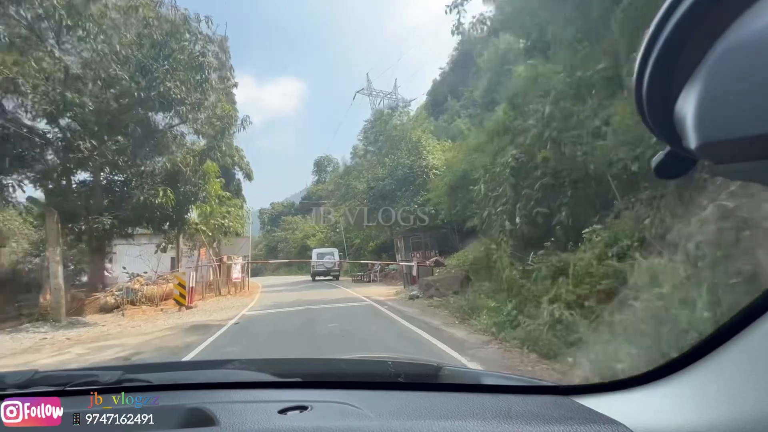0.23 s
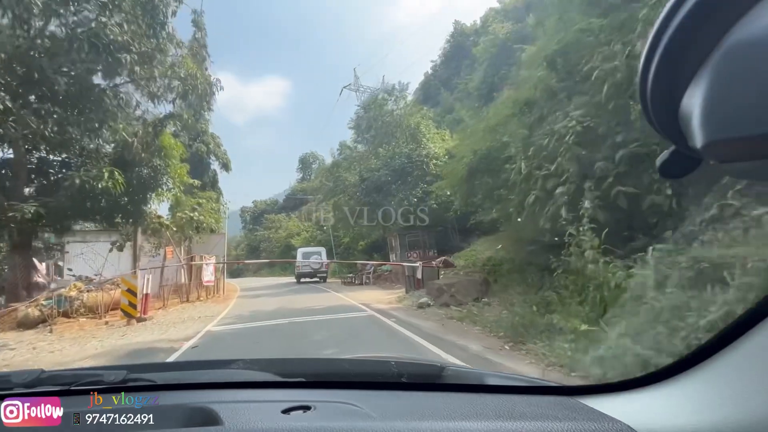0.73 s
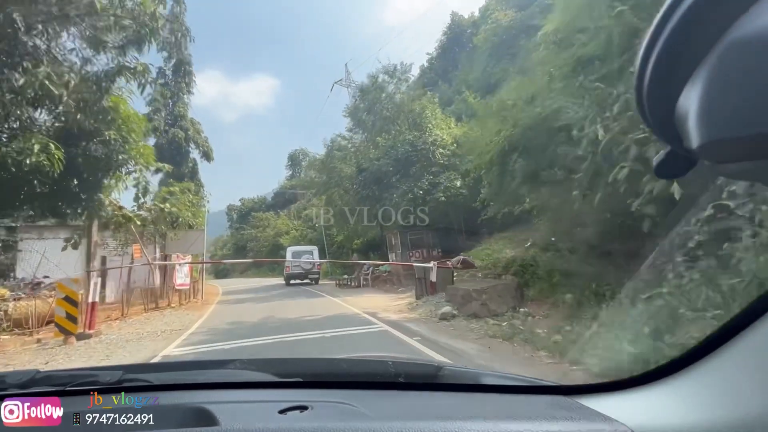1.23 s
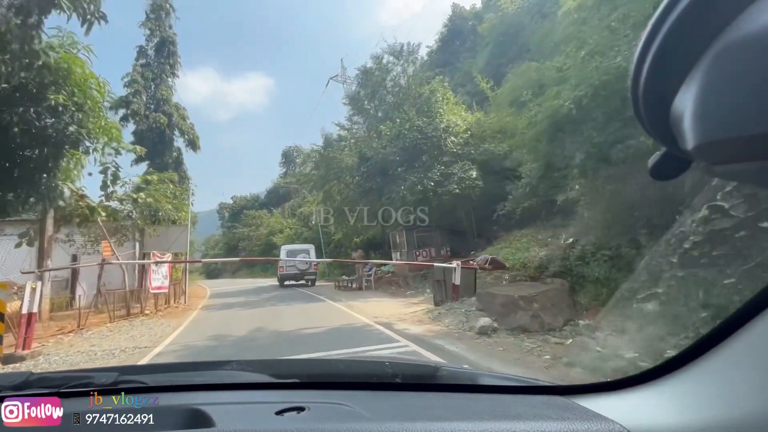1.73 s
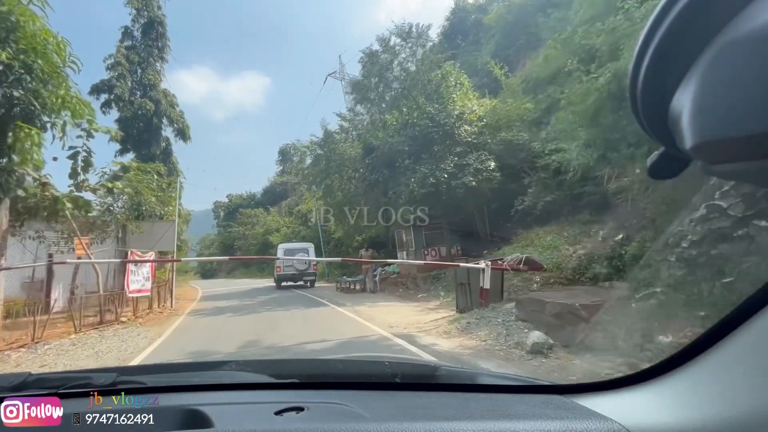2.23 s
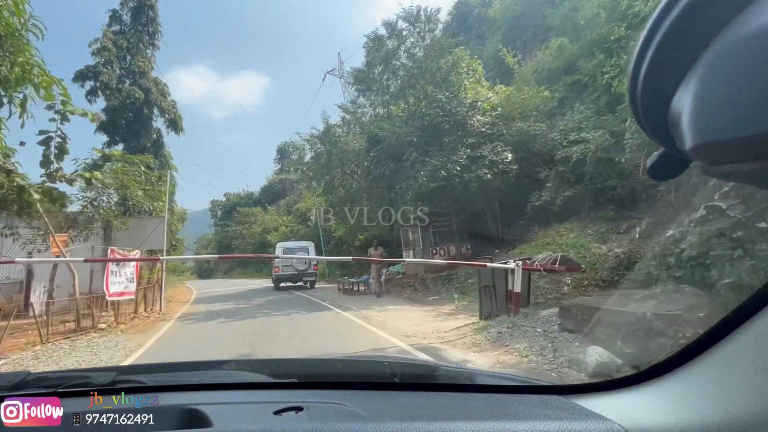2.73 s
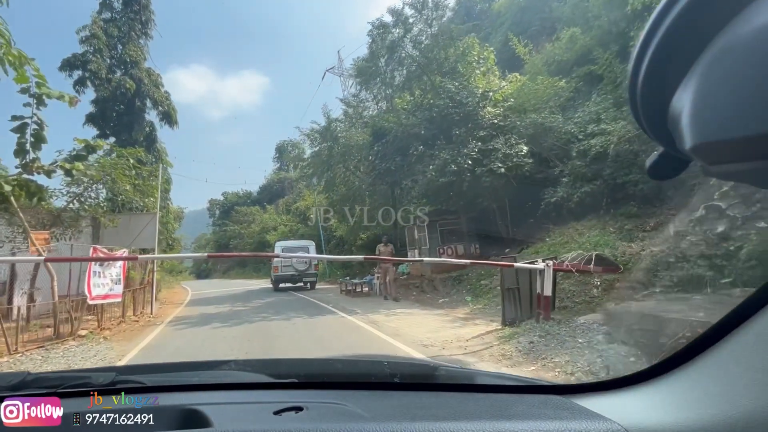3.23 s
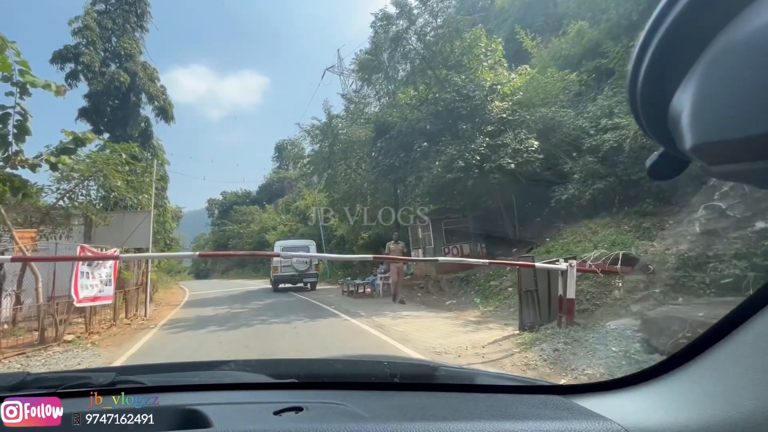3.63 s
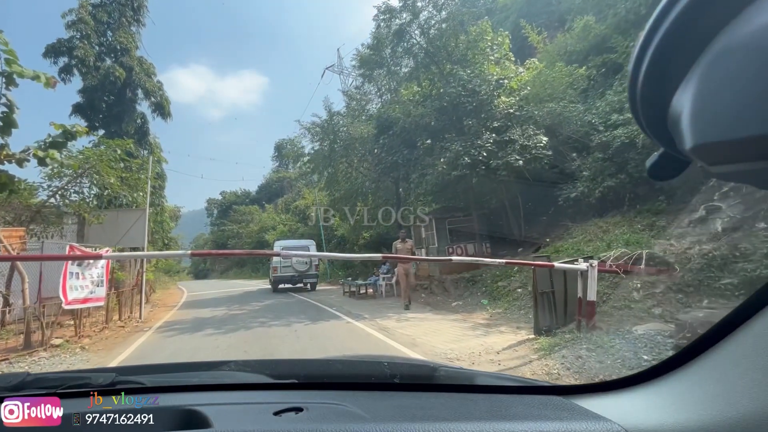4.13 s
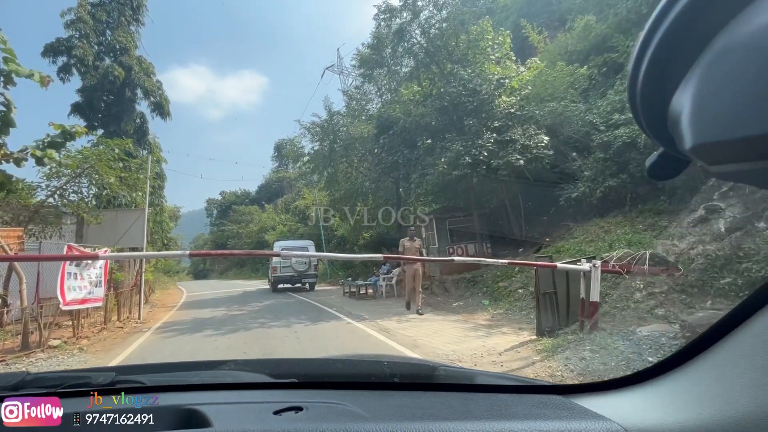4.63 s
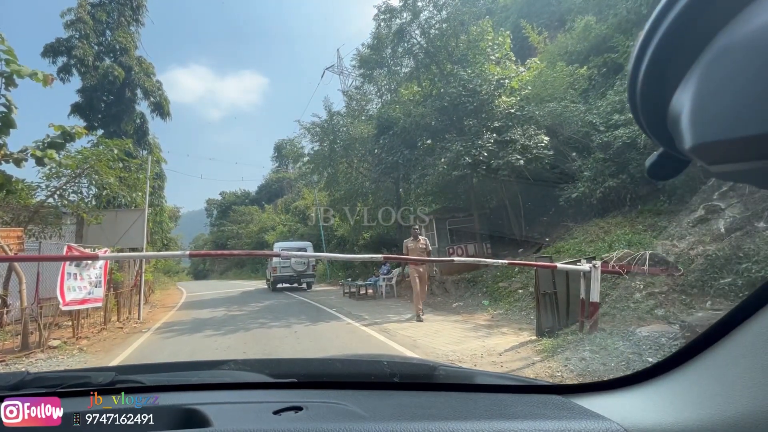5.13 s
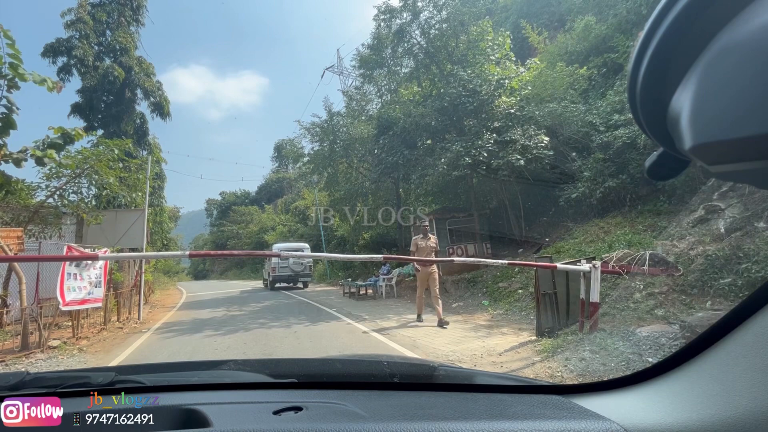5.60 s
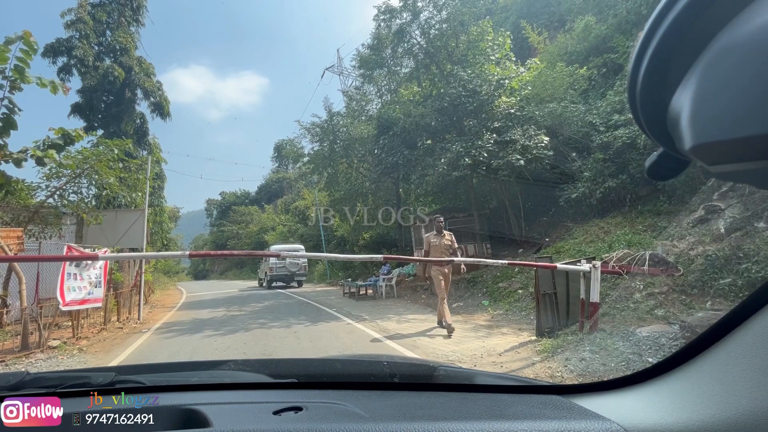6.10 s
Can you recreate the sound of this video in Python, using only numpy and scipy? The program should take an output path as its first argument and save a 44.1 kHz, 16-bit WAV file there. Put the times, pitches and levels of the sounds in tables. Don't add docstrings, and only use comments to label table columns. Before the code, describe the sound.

Heard from within a car coming to a stop: muffled rumble and steady engine drone, light rustles and a sharp little tick. The window hisses along its seal, fades, and the door jolts with a hard crackling thud. A longer scraping slide follows and stops with a softer, deep thud. Then quiet idle, thin street air, tiny high bird chirps and a closing switch click with a dull knock.

```python
import sys
import numpy as np
from scipy import signal
from scipy.fft import rfft, irfft, next_fast_len
from scipy.io import wavfile
from scipy.ndimage import uniform_filter1d

SR = 44100
rng = np.random.default_rng(int(sys.argv[2]) if len(sys.argv) > 2 else 0)


def elevation(decibels):
    levels = np.asarray(decibels, float)
    return 10 ** (levels / 20)


def unload_audio(sound):
    columns = np.transpose(np.atleast_2d(sound))
    steps = np.round(np.clip(columns, -1, 1) * 32767)
    wavfile.write(sys.argv[1], SR, steps.astype(np.int16))


N = 280564
RUN_IN = SR // 4

# (frequency [Hz], phase lead of the left port [rad])
PORT_PHASE = [(0, 0), (340, 0.1), (780, 3.4), (1290, 3.9), (2070, 2.5), (2330, 3.6), (4220, -0.3),
              (4570, -0.2), (5170, -3.5), (7580, -10.2), (8270, -10.7), (9040, -12.5), (13400, -12.6),
              (13900, -13.0)]
# (frequency [Hz], likeness of the ports [0-1])
PORT_ALIKE = [(30, 0.88), (120, 0.89), (300, 0.52), (700, 0.8), (1500, 0.06), (3000, 0.14), (6000, 0.2),
              (9000, 0.8), (11000, 0.4)]
# (frequency [Hz], left minus right [dB])
PORT_BALANCE = [(200, 0), (480, -1.5), (1100, .5), (1700, 3), (2600, 3.5), (3900, 8), (6000, 10.5),
                (7800, 8), (9200, -1), (10500, 0)]
# (frequency [Hz], density [dB per Hz])
RUMBLE_SPECTRUM = [(12, -51), (20, -16.5), (49, 0.5), (102, -0.5), (162, -16), (193, -11), (219, -20.5),
                   (245, -15), (304, -20.5), (400, -34.5), (520, -65), (880, -120)]
# (frequency [Hz], density [dB per Hz])
AIR_SPECTRUM = [(88, -20), (150, -11.5), (309, -7.5), (395, -30), (426, -19.5), (505, -14.5), (647, -29),
                (982, -23), (1060, -32), (1670, -35), (1800, -36.5), (5320, -87.5), (6810, -60),
                (14000, -85)]
# (time [s], rumble level [dB])
ROAD_LEVEL = [(0, -28), (1.0, -29), (1.2, -31.5), (1.7, -29.5), (2.3, -32), (3.2, -36.5), (3.6, -32.5),
              (4.16, -42), (4.8, -40.5), (5.1, -43), (5.4, -36), (5.77, -48), (6.36, -42.5)]
# (time [s], sixth order [Hz], effort [dB], braking load [0-1])
ENGINE_COURSE = [
    (0, 195, -43, 0.24),
    (1, 193, -48, 0.24),
    (1.6, 192, -53.5, .65),
    (2.2, 191, -57.5, 0.45),
    (2.5, 190, -49, 1),
    (3.4, 190, -51, 0.82),
    (3.75, 190, -46, 0.53),
    (4.15, 178.5, -47, 0.22),
    (6.36, 177, -48, 0),
]
# (multiple of shaft rate, level [dB])
ORDER_LEVELS = [(2, 2), (3, -0.5), (4, -3), (6, -0.5), (11.6, -14.5)]
# (time [s], level [dB])
CHIRPS = [
    (5.543, -65),
    (5.778, -66),
    (6.058, -66),
    (6.33, -68),
]
# (time [s], level [dB])
STREET_AIR = [
    (2.85, -94.5),
    (2.98, -64.5),
    (3.38, -81),
    (3.43, -57.5),
    (3.65, -66),
    (5.0, -69),
    (5.31, -66),
    (5.4, -72.5),
    (5.9, -69),
    (6.36, -74),
]
# (time of peak [s], level [dB], swell [s], fade [s], dullness [0-1])
RUSTLES = [
    (.08, -86, .1, 0.092, .2),
    (.45, -76.5, .25, .4, 0.2),
    (.6, -71.5, 0.33, 0.27, .2),
    (.86, -74, .08, .3, 0.2),
    (.94, -73.5, 0.38, 0.22, 0.2),
    (1.2, -70.5, .18, .12, 1.),
    (1.33, -77, .05, .1, .5),
    (1.62, -81, .2, .1, 0.2),
]
# (time [s], peak [dB], frequency [Hz])
PINGS = [
    (3.001, -37, 2830),
    (3.0023, -46, 2150),
    (3.16, -57, 3300),
    (3.2231, -54, 2700),
    (5.929, -42, 3000),
    (6.018, -50, 2850),
]
# (time [s], peak [dB], centre [Hz], trim ring [dB])
TICKS = [
    (.14, -46.5, 4300, 3),
    (0.6349, -35, 4830, 1),
    (1.1236, -62, 4300, -4),
    (5.9258, -39.5, 4000, 4),
    (5.9965, -56, 5200, -9),
]
# (time [s], peak [dB], centre [Hz], trim ring [dB])
CRACKS = [(0.5497, -46.5, 5970, -1), (3.4153, -40, 3700, 8.5), (3.4221, -30, 4540, 5.5),
          (3.4339, -27, 3700, -10), (3.4532, -20.5, 5100, -7.5), (3.4576, -21, 4000, -3),
          (3.4801, -25.5, 4200, -10), (3.4884, -41, 3600, -14), (3.4974, -32, 4300, -11),
          (3.512, -39, 4350, -17), (3.5324, -41, 3900, -11), (3.5597, -27.5, 4040, -14),
          (3.580, -29.5, 5160, -1.5), (5.2983, -23.5, 3900, -8), (5.3042, -33, 3300, -6),
          (5.3197, -46, 3900, 0)]
# (time [s], peak [dB], centre [Hz])
SKIN_HITS = [(.141, -55, 1500), (0.551, -46, 1900), (.637, -46.5, 1500), (1.19, -56, 2530),
             (3.425, -25.5, 1330), (3.437, -35, 1100), (3.46, -21, 1050), (3.56, -31, 820),
             (3.586, -32, 1500), (5.301, -28, 1280), (5.33, -36, 1300), (5.928, -36.5, 1340)]
# (time [s], peak [dB], t60 [s], centre [Hz])
KNOCKS = [(2.063, -34, 0.23, 483), (2.157, -45, 0.061, 364), (3.424, -22, 0.1, 324),
          (3.439, -34, 0.061, 312), (3.459, -19, 0.074, 260), (3.475, -17, 0.15, 266),
          (3.56, -29.5, 0.13, 360), (3.582, -30.5, 0.052, 334), (5.301, -24.5, 0.19, 323),
          (5.315, -32, 0.17, 420), (5.931, -30, 0.22, 312), (5.942, -35.5, 0.04, 413)]
# (frequency [Hz], level [dB], t60 [s])
PANEL_MODES = [(270, 0, .09), (333, -2, .09), (500, -4, .08), (658, -12, .06), (818, -10, .06),
               (902, -8, .06), (1063, -8, .05), (1189, -8, .05), (1400, -6, .05), (1552, -6, .05),
               (1634, -7, .05), (1976, -9, .04), (2300, -11, .04)]
# (time [s], peak [dB], frequency [Hz], rise
# [s])
LOW_BOOMS = [
    (-.0068, -20.5, 110.4, 0.0061),
    (0, -30, 139.6, 0.042),
    (0, -38.5, 270, 0.033),
             (3.45, -10.5, 60.6, 0.028), (3.44, -14, 89.7, 0.026), (3.462, -22, 131, 0.042),
         (3.455, -17.5, 167.4, 0.016), (3.563, -21, 56, 0.024), (5.314, -10.5, 49, 0.029),
         (5.31, -18.5, 116, 0.021), (5.315, -25, 174, 0.023), (5.31, -32, 165, 0.018),
         (5.355, -22, 49, 0.012), (3.462, -23, 254, 0.0091), (5.425, -24, 49.4, 0.022),
         (5.55, -29, 62, 0.02), (5.94, -32, 79.3, 0.026)]
# (frequency [Hz], density [dB per Hz])
SEAL_SPECTRUM = [(350, -56.5), (600, -27.5), (685, -7), (741, -6), (813, -6.5), (992, -12), (1470, -8.5),
                 (2440, -9.5), (3220, -6.5), (4310, 3), (4910, -4), (5990, -4.5), (8910, -23.5),
                 (12200, -38.5), (14200, -43)]
# (frequency [Hz], width [Hz], level [dB])
GLASS_MODES = [(1400, 100, -9.5), (2260, 40, -19.5), (2850, 300, -14.5), (3660, 130, -7), (4213, 160, 4.5),
               (4480, 150, 4), (5540, 150, -23), (9750, 340, -44.5)]
# (time [s], hiss level [dB], grip [0-1])
FIRST_RUN = [
    (1.6, -89.5, 0.),
    (1.7, -69.5, .1),
    (1.99, -62.5, 0.2),
    (2.2, -65, .0),
    (2.5, -51.5, .05),
    (2.884, -52, .5),
    (2.93, -58, .6),
    (3.26, -72.5, .4),
    (3.4, -78, .3),
]
# (time [s], hiss level [dB], grip [0-1])
SECOND_RUN = [
    (3.415, -79, .9),
    (3.47, -41, 0.86),
    (3.55, -50.5, .9),
    (3.9, -50.5, 0.73),
    (4.2, -48, 0.88),
    (4.7, -48, 0.88),
    (5.2, -57.5, .6),
    (5.33, -55.5, 0.86),
    (5.4, -77.5, .9),
]

AIR_DB, AIR_RISE_DB, AIR_RISE_S = -44.5, 3, 1.34
THIRD_DB, THIRD_LOAD_DB = -5, 15.5
WHINE_HZ, WHINE_DB, WHINE_LOAD_DB = 964, -80, 14
CHIRP_S, CHIRP_START_HZ, CHIRP_END_HZ = .04, 6500, 5750
RIPPLE_DB = 2.3
TRIM_HZ, TRIM_WIDTH_HZ = 1700, 1700
TICK_T60_S, TICK_SHARPNESS = 0.059, 3.6
CRACK_T60_S, CRACK_SHARPNESS = 0.054, 3.6
SKIN_T60_S, SKIN_SHARPNESS = 0.11, 3.7
PING_T60_S, PING_RISE_S = 0.025, 0.00077
PANEL_RING_DB = -11
RUSTLE_FLOOR_DB, RUSTLE_TOP_DB, RUSTLE_BODY_DB, DULL_TOP_DB = -98, -2, -1.5, 18.5
OUTSIDE_TOP_DB, OUTSIDE_BODY_DB = -12.5, 11.5
LIGHT_TOP_DB, GRIP_DULLS_DB, SLIDE_BODY_DB = -3, 10.5, -6
SEAL_TOP_DB, SEAL_BODY_DB = -14.5, -7
TOP_HZ = 13500


def in_time(rows):
    s, *columns = np.transpose(rows)
    return [np.interp(np.arange(N) / SR, s, c) for c in columns]


def at_hz(points, hz):
    table_hz, values = np.array(points).T
    return np.interp(np.log(hz), np.log(table_hz), values)


def rms_one(x):
    return x / np.sqrt(np.mean(x ** 2) + 1e-20)


def drift(rate):
    r = np.exp(-80 * np.pi * rate / SR)
    chance = rng.standard_normal(N // 40 + 2002)
    slow = rms_one(signal.lfilter([1], [1, -2 * r, r * r], chance)[2000:])
    return np.interp(np.arange(N) / 40, np.arange(len(slow)), slow)


def resonance(x, hz, width_hz):
    r = np.exp(-np.pi * width_hz / SR)
    poles = [1, -2 * r * np.cos(2 * np.pi * hz / SR), r * r]
    return signal.lfilter([(1 - r * r) / 2, 0, (r * r - 1) / 2], poles, x)


def cabin_ripple(size):
    width = round(30 * size / SR)
    chance = rng.standard_normal((2, size // 2 + 1))
    return RIPPLE_DB * rms_one(uniform_filter1d(uniform_filter1d(chance, width), width))


def port_noise(ripple_db):
    size = next_fast_len(N + RUN_IN)
    hz = np.maximum(np.arange(size // 2 + 1) * SR / size, 1)
    left, own = rfft(rng.standard_normal((2, size)))
    alike = np.clip(at_hz(PORT_ALIKE, hz), 0, 1)
    delayed = left * np.exp(-1j * np.interp(hz, *np.transpose(PORT_PHASE)))
    right = alike * delayed + np.sqrt(1 - alike ** 2) * own
    shade = elevation(at_hz(PORT_BALANCE, hz) / 2)
    mid = np.sqrt((shade ** 2 + shade ** -2) / 2)
    colour = elevation(ripple_db * np.clip(hz / 900, 0, 1)) / mid
    return irfft(np.array([left * shade, right / shade]) * colour, size)[:, :N + RUN_IN]


def bands(white, spectrum, patchy_db, flicker, top_db=0, body_db=0):
    out, power, together = 0, 0, drift(flicker / 4)
    lowest, highest = spectrum[0][0], spectrum[-1][0]
    edges = np.geomspace(lowest, highest, round(2.5 * np.log2(highest / lowest)))
    for k, (low, high) in enumerate(zip(edges, edges[1:])):
        hz = np.sqrt(low * high)
        sos = signal.butter(2, [low, high], "band", fs=SR, output="sos")
        band = elevation(at_hz(spectrum, hz)) * signal.sosfilt(sos, white[k % 2])[:, RUN_IN:]
        power += np.mean(band.mean(axis=0) ** 2)
        colour_db = top_db * np.log2(max(hz, 4000) / 4600) / 0.66 if hz > 2900 else body_db
        out = out + band * elevation(colour_db + patchy_db * (0.56 * together + drift(flicker)))
    return out / np.sqrt(power)


def cabin(white):
    road_db, = in_time(ROAD_LEVEL)
    air_db = AIR_DB - AIR_RISE_DB * np.clip(1 - np.arange(N) / SR / AIR_RISE_S, 0, 1)
    road = bands(white, RUMBLE_SPECTRUM, patchy_db=2.0, flicker=11.2)
    air = bands(white[::-1, :, ::-1], AIR_SPECTRUM, patchy_db=0.8, flicker=5.2)
    return elevation(road_db + 0.34) * road + elevation(air_db - 0.5) * air


def engine():
    sixth_hz, effort_db, load = in_time(ENGINE_COURSE)
    third_db = THIRD_DB + THIRD_LOAD_DB * load
    whine_db = WHINE_DB + WHINE_LOAD_DB * load
    turn = 2 * np.pi * np.cumsum(sixth_hz / 6) / SR
    orders = 0
    for k, db in ORDER_LEVELS:
        level = elevation(db + (k == 3) * third_db + 1.75 * drift(1.4))
        orders = orders + level * np.sin(k * turn + .5 * drift(4.1))
    whine_phase = 2 * np.pi * WHINE_HZ * np.arange(N) / SR + 0.6 * drift(5)
    whine = elevation(whine_db + 2.9 * drift(9.3)) * np.sin(whine_phase)
    return np.sqrt(2) * (elevation(effort_db) * orders + whine)


def bird():
    out, clock = np.zeros(N), np.arange(N) / SR
    for s, db in CHIRPS:
        u = np.clip((clock - s) / CHIRP_S, 0, 1)
        cycles = CHIRP_S * (CHIRP_START_HZ * u + (CHIRP_END_HZ - CHIRP_START_HZ) * u * u / 2)
        out += elevation(db) * np.sin(np.pi * u) * np.sin(2 * np.pi * cycles)
    tremor = rms_one(signal.lfilter([1], [1, -.95], rng.standard_normal(N)))
    out = out * (.4 + .8 * tremor)
    echoes = [(.011, .6), (.027, .4), (.05, .25)]   # (lag [s], gain)
    return out + sum(gain * np.interp(clock - lag, clock, out) for lag, gain in echoes)


def pings():
    out, t = np.zeros(N), np.arange(round(.1 * SR)) / SR
    for s, db, hz in PINGS:
        at = round(s * SR)
        envelope = elevation(db - 60 * t / PING_T60_S) * np.minimum(t / PING_RISE_S, 1)
        out[at:at + len(t)] += envelope * np.sin(2 * np.pi * hz * t)
    return out * elevation(np.array([[2.5], [-2.5]]))


def bursts(white, rows, crack_db, rise, top_hz):
    out = np.zeros((2, N))
    grit = elevation(3.3 * rms_one(uniform_filter1d(rng.standard_normal(N + SR), size=40)))
    t = np.arange(round(.25 * SR)) / SR
    for s, db, t60, hz, *more in rows:
        trim_db, sharpness = more or (-60, 3.0)
        at = round(s * SR)
        shape = elevation(-60 * t / t60) * grit[at:at + len(t)] + elevation(crack_db - 60 * t / 0.0053)
        puff = white[:, at:at + len(t)] * shape * np.minimum(t / rise, 1)
        core = resonance(puff, hz, hz / sharpness)
        trim = resonance(puff, TRIM_HZ, TRIM_WIDTH_HZ)
        hit = core / np.abs(core).max() + elevation(trim_db) * trim / np.abs(trim).max()
        out[:, at:at + len(t)] += elevation(db + 2.5) * hit
    return signal.sosfilt(signal.butter(6, top_hz, fs=SR, output="sos"), out + 1e-18)


def ticks(white):
    rows = [(s, db, TICK_T60_S, hz, trim, TICK_SHARPNESS) for s, db, hz, trim in TICKS]
    return bursts(white, rows, crack_db=-7.5, rise=0.001, top_hz=11700)


def cracks(white):
    rows = [(s, db, CRACK_T60_S, hz, trim, CRACK_SHARPNESS) for s, db, hz, trim in CRACKS]
    return bursts(white, rows, crack_db=-2.0, rise=0.00094, top_hz=7700)


def skin(white):
    rows = [(s, db, SKIN_T60_S, hz, -40, SKIN_SHARPNESS) for s, db, hz in SKIN_HITS]
    return bursts(white, rows, crack_db=-14, rise=0.0018, top_hz=3000)


def panel():
    out, t = np.zeros((2, N)), np.arange(round(.2 * SR)) / SR
    hz, mode_db, t60 = np.transpose(PANEL_MODES)[:, :, None]
    lead = np.interp(hz, *np.transpose(PORT_PHASE)) / 2
    chances = rng.standard_normal((len(KNOCKS), len(PANEL_MODES), 1))
    for (s, db, *_), chance in zip(KNOCKS, chances):
        level_db = db + PANEL_RING_DB + mode_db + 3 * chance
        rings = elevation(level_db - 60 * t / t60) * np.minimum(t / .0025, 1)
        phase = 2 * np.pi * hz * t + 3 * chance
        at = round(s * SR)
        out[:, at:at + len(t)] += [np.sum(rings * np.sin(phase + side * lead), axis=0) for side in (1, -1)]
    return out


def knocks(white):
    return bursts(white, KNOCKS, crack_db=-17, rise=0.0033, top_hz=1000) + panel()


def booms():
    out, clock = np.zeros(N), np.arange(N) / SR
    for s, db, hz, rise in LOW_BOOMS:
        t = np.clip(clock - s, 0, None)
        envelope = (t / rise * np.exp(1 - t / rise)) ** 2
        out += elevation(db) * envelope * np.sin(2 * np.pi * hz * t)
    return np.array([np.interp(clock - .0003, clock, out), np.interp(clock + 0.00051, clock, out)])


def rustle():
    clock = np.arange(N) / SR
    levels = np.array([db - 20 * np.maximum((s - clock) / swell, (clock - s) / fade)
                       for s, db, swell, fade, _ in RUSTLES])
    dull = np.array(RUSTLES)[levels.argmax(axis=0), -1]
    top_db = RUSTLE_TOP_DB - DULL_TOP_DB * uniform_filter1d(dull, size=900)
    return np.maximum(levels.max(axis=0), RUSTLE_FLOOR_DB), top_db


def hiss_controls():
    slide_db, grip = in_time(FIRST_RUN + SECOND_RUN)
    street_db, = in_time(STREET_AIR)
    cloth_db, cloth_top_db = rustle()
    power = elevation(2 * np.array([slide_db, street_db, cloth_db]))
    total = power.sum(axis=0)
    slide_top_db = LIGHT_TOP_DB - GRIP_DULLS_DB * grip
    top_db = (power[0] * slide_top_db + power[1] * OUTSIDE_TOP_DB + power[2] * cloth_top_db) / total
    body = elevation(2 * np.array([SLIDE_BODY_DB, OUTSIDE_BODY_DB, RUSTLE_BODY_DB])) @ power
    return 10 * np.log10(total), top_db, 10 * np.log10(body / total)


def glass(white):
    hiss_db, top_db, body_db = hiss_controls()
    top_db, body_db = top_db - SEAL_TOP_DB, body_db - SEAL_BODY_DB
    hiss = bands(white, SEAL_SPECTRUM, patchy_db=0.86, flicker=22, top_db=top_db, body_db=body_db)
    sung = 0
    for k, (hz, width, db) in enumerate(GLASS_MODES):
        mode = rms_one(resonance(white[k % 2], hz, width))[:, RUN_IN:]
        sung = sung + elevation(db + 2.0 * drift(6)) * mode
    sung_db = -5.5 - .5 * np.maximum(top_db, 0) + 0.39 * np.minimum(hiss_db + 50, 0)
    return elevation(hiss_db - 2.0) * (hiss + elevation(sung_db) * sung)


def scene():
    white = np.array([port_noise(cabin_ripple(next_fast_len(N + RUN_IN))) for _ in range(2)])
    background = cabin(white) + engine() + bird() * elevation(np.array([[3], [-4]]))
    small_parts = pings() + ticks(white[0]) + cracks(white[0])
    door = skin(white[1]) + knocks(white[1]) + booms()
    return background + small_parts + door + glass(white[::-1])


def band_limit(x):
    return signal.sosfilt(signal.butter(12, 14310, fs=SR, output="sos"), x)


def record(dry):
    rounded = 0.74 * np.tanh(dry / 0.76)
    mix = signal.sosfilt(signal.butter(8, TOP_HZ, fs=SR, output="sos"), rounded)
    return band_limit(mix)


dry = scene()
out = record(dry)
unload_audio(out)
```